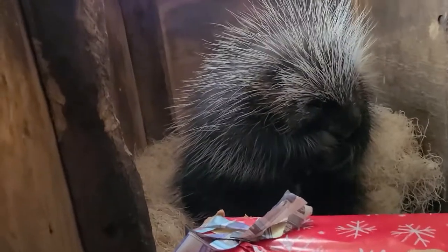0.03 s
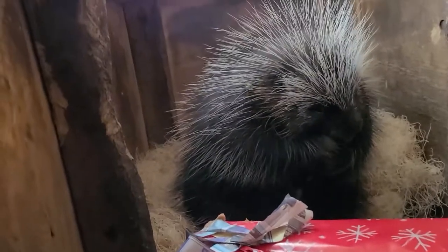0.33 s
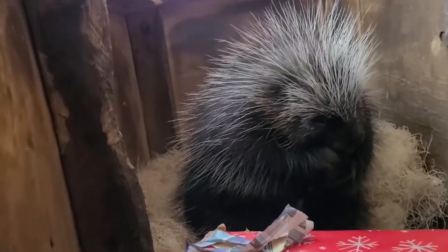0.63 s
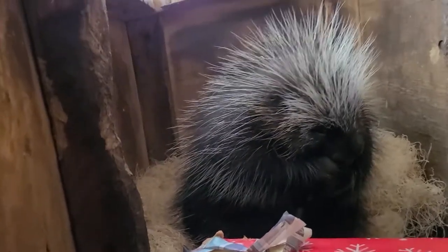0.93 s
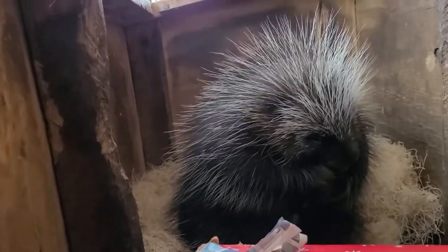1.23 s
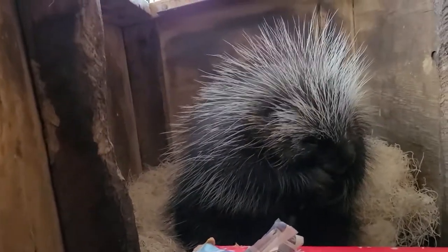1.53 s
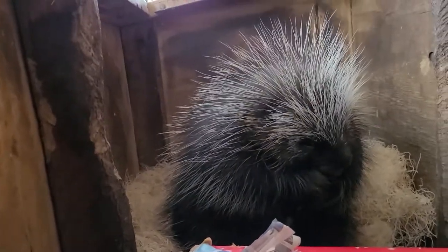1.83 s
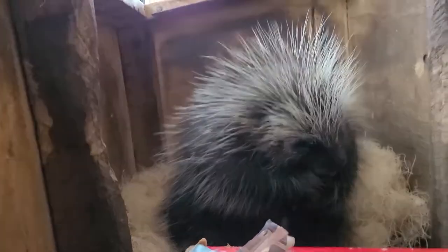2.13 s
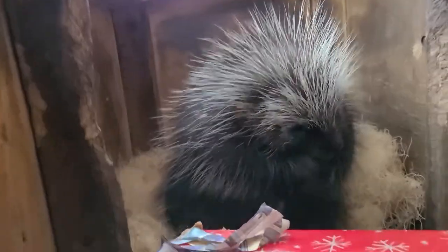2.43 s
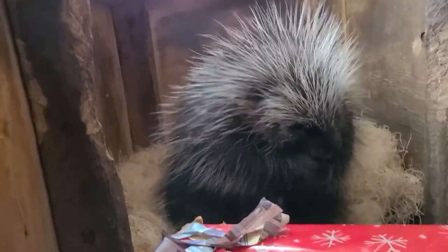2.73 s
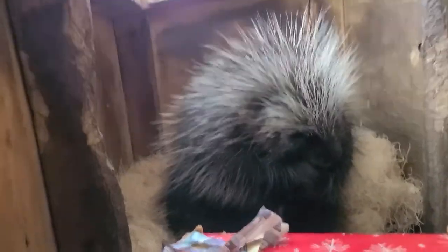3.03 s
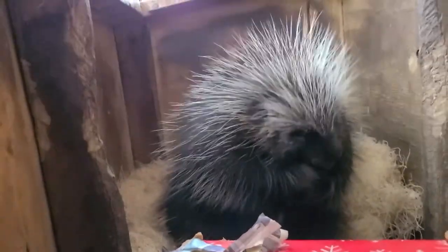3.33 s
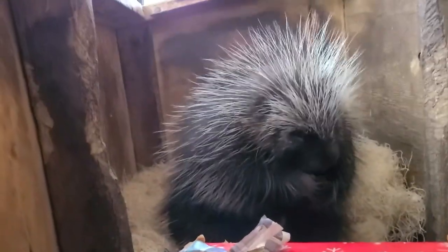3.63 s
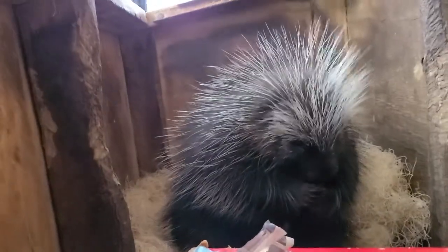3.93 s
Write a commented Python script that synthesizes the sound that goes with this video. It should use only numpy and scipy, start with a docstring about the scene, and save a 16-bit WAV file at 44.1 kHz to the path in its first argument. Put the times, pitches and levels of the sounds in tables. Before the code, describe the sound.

A porcupine chews dry food close by in a wooden den, with quick crisp crunches, soft tooth grinding and a few dull jaw knocks. The chewing stops near the end while low ventilation keeps rumbling.

```python
"""A porcupine chewing in its den

A porcupine chews dry food in a wooden den, five to six bites a second, then pauses.
In each bite the teeth grind softly and slip, and the food gives way in a crackle of tiny breaks.
Some bites add a dull knock of the jaw. Head and den colour the sound, and ventilation
rumbles steadily underneath."""
import sys
import numpy as np
from scipy import signal
from scipy.fft import rfft
from scipy.io import wavfile
from scipy.ndimage import uniform_filter1d

SR = 44100
rng = np.random.default_rng(int(sys.argv[2]) if len(sys.argv) > 2 else 0)


def pcm_store(signal):
    """Save signal as 16-bit PCM."""
    levels = np.round(np.clip(np.atleast_2d(signal), -1, 1) * 32767)
    wavfile.write(sys.argv[1], SR, levels.astype(np.int16).T)


N = 176400

# The food giving way, one row a bite; the last four columns set the tone of the crackle.
# start_s, length_s, level_db, bass_db, middle_db, edge_db, treble_db
CRUNCHES = [(0.1035,0.013,-16.5,1.5,5,-4.5,-11), (0.286,0.0053,-19,-2,8.5,-4,-12),
            (0.4705,0.006,-20.5,8,4,-10,-13), (0.64,.012,-24.5,7.5,7.5,-6,-12),
            (0.832,0.0085,-21,1,5.5,-6,-14), (1.017,.013,-25,5,5,-0.5,-10.5),
            (1.187,0.0095,-19.5,-8,-1,-9,-13), (1.353,0.012,-29,4,9.5,-4,-12),
            (1.551,0.014,-14,-1,.5,-9,-15.5), (1.734,0.005,-18,-4,0,-6,-15.5),
            (1.9,0.014,-19,-1,-1,-0.5,-12.5), (2.09,.009,-24.5,-10,4,0.5,-11.5),
            (2.3,0.004,-25,7,-12,-5,-10.5), (2.492,0.014,-22.5,5,-2,-2,-12),
            (2.728,0.01,-20.5,6.5,-4,-8,-13.5), (2.929,0.0098,-21.5,2,-12,-8.5,-14),
            (3.119,0.0039,-21,-3,0,-11,-10.5)]
GRIND_LEAD_S, GRIND_AFTER_S = 0.06, 0.03  # grinding before and after each crunch starts


def amp(db):
    """Turns decibels into a number to multiply a sound by."""
    return 10 ** (np.asarray(db) / 20)


def unit_level(x):
    """Scales a signal to an average (rms) level of one."""
    return x / np.sqrt(np.mean(x ** 2) + 1e-20)


def look_up(points, hz):
    """Reads between the rows of a table, on a logarithmic frequency scale."""
    row_hz, value = np.transpose(points)
    return np.interp(np.log(hz + 1), np.log(row_hz + 1), value)


def add(mix, start_s, sound):
    """Mixes a sound in at a given time."""
    part = mix[max(round(start_s * SR), 0):][:len(sound)]
    part += sound[:len(part)]


def tone_filter(db, size):
    """The quickest-acting filter that has the given boost or cut at each frequency."""
    log_gain = np.log(amp(np.concatenate([db, db[-2:0:-1]])))
    spectrum = np.exp(np.conj(signal.hilbert(log_gain)))
    return np.fft.ifft(spectrum).real[:size]


def even_tone(x, smooth_bins):
    """Takes the broad humps out of a sound's spectrum and keeps its fine grain."""
    power = uniform_filter1d(abs(rfft(x, 4096)) ** 2, size=smooth_bins)
    return signal.fftconvolve(x, tone_filter(-10 * np.log10(abs(power) + 1e-9), size=1024))


def ventilation(level_db=-26.5, flicker_db=1.0, size=4096):
    """Air rumbles in ringing ducts under a faint hiss; the rumble slowly grows and the hiss fades."""
    # Tone of the moving air: frequency_hz, level_db
    air_tone = [(20,-10),(30,-29.5),(42,2),(52,-7.5),(72,3.5),(88,-1),(105,-4),(165,-7),(215,-18.5),(245,-16),(272,-8),(310,-17.5),(350,-14),(395,-9),(470,-16.5),(550,-20),(605,-15.5),(700,-24),(850,-28),(1050,-28),(1400,-28.5),(1700,-28.5),(2200,-34.5),(3500,-38),(5500,-43),(8200,-46),(9000,-51),(10500,-50),(12200,-45.5),(15800,-47.5)]
    # How alike the two sides are (1 means the same): frequency_hz, likeness
    likeness = [(25,.9),(60,.975),(120,.965),(200,.85),(330,.76),(500,.6),(770,.13),(1170,-.15),(4000,-.13),(7000,0)]
    # Which side is louder: frequency_hz, left_minus_right_db
    balance = [(40,0),(130,-1.5),(260,-0.8),(380,-0.3),(550,-0.5),(750,-5.5),(1100,-2.5),(2500,-1.5),(5000,-2.5),(8000,3),(9500,-3.5),(15000,-1.5)]
    # Slow changes in rumble and hiss: time_s, bass_db, treble_db
    drift = [(0,-7,2),(.8,-4,1),(1.4,-2,-1.5),(1.95,0.5,-3.5),(2.4,-3,-2),(3.1,-1,-4.5),(3.55,-0.5,-6),(3.9,0,-6.5)]
    # How much of the bass change each frequency gets: frequency_hz, share
    bass_share = [(100,1),(250,0.54),(700,0.58)]
    # The same for the treble change: frequency_hz, share
    hiss_share = [(700,0.48),(2000,0.88),(4000,1.1),(8000,0.68),(13000,0.79)]
    hop = size // 4
    frames, hz = N // hop + 5, np.fft.rfftfreq(size, 1 / SR)
    noise = rng.standard_normal((5, frames, len(hz)))
    left, unrelated = noise[0] + 1j * noise[1], noise[2] + 1j * noise[3]
    alike = np.clip(look_up(likeness, hz), -1, 1)
    spectra = np.array([left, alike * left + np.sqrt(1 - alike ** 2) * unrelated])
    flicker = uniform_filter1d(noise[4], size=3, axis=0)  # smooth over time, then over frequency
    flicker = unit_level(uniform_filter1d(flicker, size=30, axis=1))
    t = np.arange(frames)[:, None] * hop / SR
    time_s, bass_db, treble_db = np.transpose(drift)
    drift_db = np.interp(t, time_s, bass_db) * look_up(bass_share, hz)
    drift_db += np.interp(t, time_s, treble_db) * look_up(hiss_share, hz)
    spectra *= amp(look_up(air_tone, hz) + drift_db + flicker_db * flicker) * (hz > 0)
    spectra *= amp(np.array([.5, -.5])[:, None, None] * look_up(balance, hz))
    air = signal.istft(spectra.transpose(0, 2, 1), nperseg=size, noverlap=size - hop)[1]
    return amp(level_db) * unit_level(air[:, :N])


def crackle(shape, bass_db, middle_db, edge_db, treble_db, breaks_per_s=4000, spread_db=3):
    """Dry food breaks in many tiny clicks of uneven size; shape is their loudness over time."""
    chance, size, sign = rng.random((3, SR // 4))[:, :len(shape)]
    breaks = chance < breaks_per_s / SR
    strength = amp(spread_db * np.minimum(-np.log(size + 1e-9), 3))  # many small, few large
    clicks = shape * breaks * np.sign(sign - .5) * strength
    bands = [(1000, bass_db), (2400, middle_db), (3600, 0), (4400, 0),
             (6000, edge_db), (8000, treble_db), (15000, 2.12 * treble_db)]  # frequency_hz, level_db
    tone = tone_filter(look_up(bands, np.fft.rfftfreq(256, 1 / SR)), size=128)
    return np.convolve(even_tone(clicks, smooth_bins=71), tone)


def scrape(time_s, shape, treble_db):
    """A tooth slides over the food, sounding thinner as the mouthful is ground down."""
    # Fullness of the scrape: time_s, middle_db
    fullness = [(0,4),(1.6,-1.5),(3.1,-0.5)]
    middle_db = np.interp(time_s, *np.transpose(fullness))
    return crackle(shape, bass_db=4, middle_db=middle_db, edge_db=treble_db / 2, treble_db=treble_db)


def grind(time_s):
    """The teeth grind in a soft, dull scrape that swells and fades."""
    swell = np.hanning(int((GRIND_LEAD_S + GRIND_AFTER_S) * SR)) ** .5
    return amp(-27) * scrape(time_s, swell, treble_db=-26.5)


def crunch(length_s, tone_db, rise_s=0.0034):
    """The food gives way in a crackle that builds quickly and stops short."""
    rise = np.interp(np.arange(0, length_s, 1 / SR), [0, rise_s], [0.5, 1])
    return crackle(rise, *tone_db)


def bites(slip_s=0.0056, slip_lead_s=0.00064):
    """Each bite grinds softly, slips in short scrapes and ends in a crunch."""
    # Teeth slipping on the food: time_s, level_db, treble_db
    slips = [(0.0597,-25,-16),(0.0662,-24.5,-28),(0.0717,-32,-15),(0.2596,-27,-16),(0.2736,-24,-20),(0.2806,-20.5,-15),
             (0.4184,-31,-11.5),(0.4498,-26,-15),(0.459,-24,-24),(0.4617,-22,-19),(0.6317,-25,-20),
             (0.793,-26,-24),(0.8034,-22.5,-20),(0.819,-22.5,-21),(0.9833,-26,-20),(1.001,-25,-15),(1.0087,-20.5,-19),
             (1.168,-31,-11),(1.1787,-21.5,-15),(1.3464,-32,-14),(1.498,-27,-17),(1.5165,-27,-21),(1.5264,-22.5,-23),
             (1.7164,-22,-15),(1.7274,-17,-15),(1.878,-29,-13),(1.8891,-30,-11),(2.0472,-24.5,-16),(2.0785,-24.5,-20),
             (2.2535,-25.5,-12.5),(2.2684,-25,-20),(2.2814,-35,-22),(2.4493,-27,-14),(2.475,-21.5,-21),(2.4826,-23.5,-19),
             (2.6973,-21,-16.5),(2.7022,-29,-20),(2.9143,-20,-18),(2.9214,-26,-21),(3.0862,-25,-15),(3.092,-38,-8)]
    out, slip_shape = np.zeros(N), np.hanning(int(slip_s * SR))
    for time_s, level_db, treble_db in slips:
        add(out, time_s - slip_lead_s, amp(level_db - 1) * scrape(time_s, slip_shape, treble_db))
    for start_s, length_s, level_db, *tone_db in CRUNCHES:
        add(out, start_s, amp(level_db + 0.5) * crunch(length_s, tone_db))
        add(out, start_s - GRIND_LEAD_S, grind(start_s))
    return out


def ring_and_scatter(x, colour, rings, fade_60db_s=0.023, scatter_db=5.5, size=4096):
    """Mouth and den ring at certain pitches, and echoes off nearby boards smear each click."""
    hz, t = np.fft.rfftfreq(size, 1 / SR), np.arange(size) / SR
    ring_db = sum(boost / (1 + (2 * (hz - pitch) / width) ** 2) for pitch, width, boost in rings)
    tone = tone_filter(look_up(colour, hz) + ring_db, size=size // 2)
    scatter = rng.standard_normal(size) * amp(-60 * t / fade_60db_s)
    scatter *= amp(scatter_db) / np.linalg.norm(scatter)
    scatter[0] += 1  # the sound that arrives directly
    response = signal.fftconvolve(even_tone(scatter, smooth_bins=21), tone)
    return signal.oaconvolve(x, response)


def moving_head(teeth, pitch_spread=0.01, boost_spread_db=1.5, right_lag_s=0.00009):
    """Jaw and head shift, so the ringing and the echoes change from bite to bite."""
    # Tone of the chewing on the left: frequency_hz, level_db
    left_colour = [(100,-8),(500,16),(900,4.5),(1300,7.5),(1600,5.5),(2400,7),(3000,2.5),(3450,3),(3700,4.5),(4500,8),(5400,1),(6400,14),(7800,12),(9500,13),(15500,13.5)]
    # The same on the right: frequency_hz, level_db
    right_colour = [(100,-48),(700,16),(1100,-0.5),(1500,6.5),(2300,4.5),(3200,1),(3400,12),(4200,9.5),(5400,4.5),(6000,15),(6900,12),(8300,14.5),(10500,14.5),(15500,22.5)]
    # Where mouth and den ring: pitch_hz, width_hz, boost_db
    resting_rings = [(1430,67,2.5),(1676,143,12),(2113,170,6.5),(2580,180,2.5),(3020,77,6.5),(3443,120,6.5),(3713,200,6),(4030,150,1.5),(5040,240,6),(5870,130,6.5),(6520,350,3.5),(9600,130,1.5),(10500,260,-1)]
    out = np.zeros((2, N))
    bite_ends = [round((start_s + 2 * GRIND_AFTER_S) * SR) for start_s, *_ in CRUNCHES]
    for start, end in zip([0] + bite_ends, bite_ends):
        moves = rng.standard_normal((len(resting_rings), 2))
        rings = [(pitch * (1 + pitch_spread * shift), width, boost + boost_spread_db * lift)
                 for (pitch, width, boost), (shift, lift) in zip(resting_rings, moves)]
        add(out[0], start / SR, ring_and_scatter(teeth[start:end], left_colour, rings))
        add(out[1], start / SR + right_lag_s, ring_and_scatter(teeth[start:end], right_colour, rings))
    return out


def den_echo(x, rise_s=0.0014):
    """Echoes off the wooden walls blur into a short tail; the highest treble dies first."""
    # Time the echo takes to fall by 60 dB: frequency_hz, fade_s
    fade_times = [(300,0.14),(1500,0.12),(4000,0.067),(8000,0.18),(15000,0.045)]
    # Tone of the echo: frequency_hz, level_db
    echo_tone = [(1400,6.5),(2600,5),(3700,2),(7000,-4.5),(14000,-1)]
    hz, t, spectra = signal.stft(rng.standard_normal((2, SR // 2)), SR, nperseg=256)
    tail_db = look_up(echo_tone, hz)[:, None] - 60 * t / look_up(fade_times, hz)[:, None]
    tail = signal.istft(spectra * amp(tail_db), SR, nperseg=256)[1]
    tail *= np.minimum(np.arange(tail.shape[1]) / SR / rise_s, 1)
    return signal.fftconvolve(x, tail / np.linalg.norm(tail[0]), axes=1)[:, :N]


def jaw_knocks(width_hz=430, fade_s=0.01):
    """Some bites add a dull knock of the jaw, stronger on the right."""
    # Knocks of the jaw: start_s, level_db, pitch_hz
    knocks = [(.111,-36.5,726), (.287,-38.5,690), (0.645,-41,636), (1.735,-42,770), (2.255,-37,650)]
    out, t = np.zeros(N), np.arange(SR // 50) / SR
    for start_s, level_db, pitch_hz in knocks:
        band = signal.iirpeak(pitch_hz, pitch_hz / width_hz, SR)
        push = np.exp(-(t / fade_s) ** 2) * rng.standard_normal(len(t))
        knock = signal.lfilter(*band, signal.lfilter(*band, push))
        add(out, start_s, amp(level_db) * unit_level(knock))
    return out * amp([[-3], [3]])


def scene():
    """The chewing animal and the echo of its den, over the ventilation."""
    teeth = amp(11.5) * bites()
    chewing = jaw_knocks() + moving_head(teeth)
    return chewing + amp(-14) * den_echo(chewing) + ventilation()


def record(dry):
    """Cuts away the very highest treble, above 15950 Hz."""
    low_pass = signal.firwin(511, 15950, window=("kaiser", 9), fs=SR)
    return signal.oaconvolve(dry, low_pass[None], "same")


dry = scene()
out = record(dry)
pcm_store(out)
```